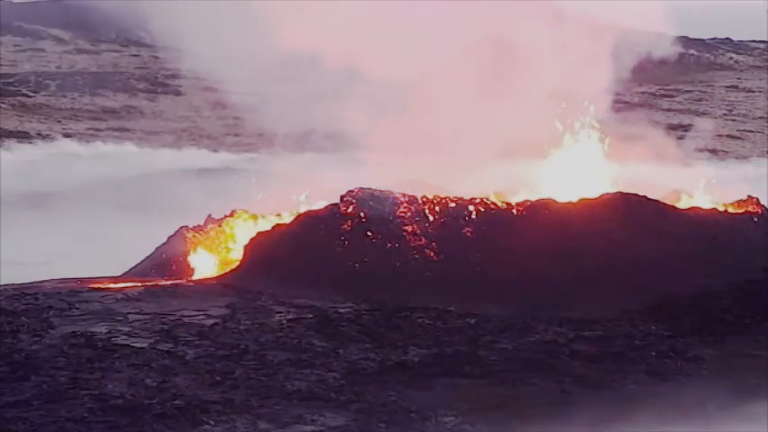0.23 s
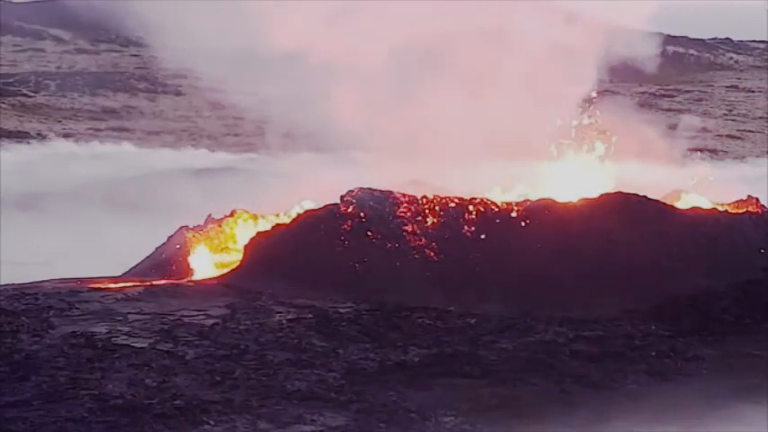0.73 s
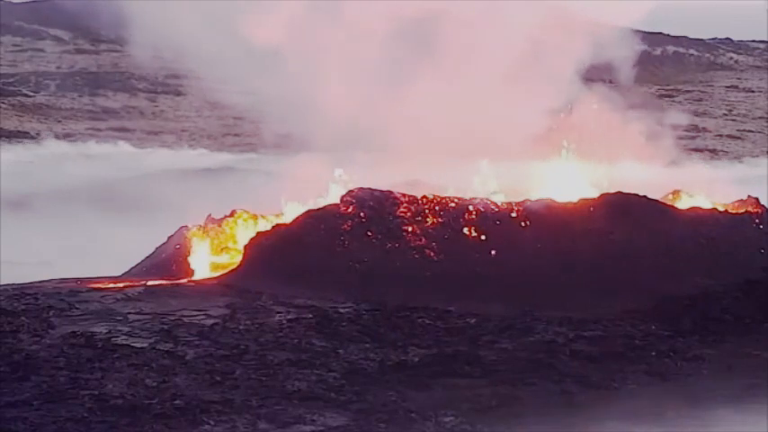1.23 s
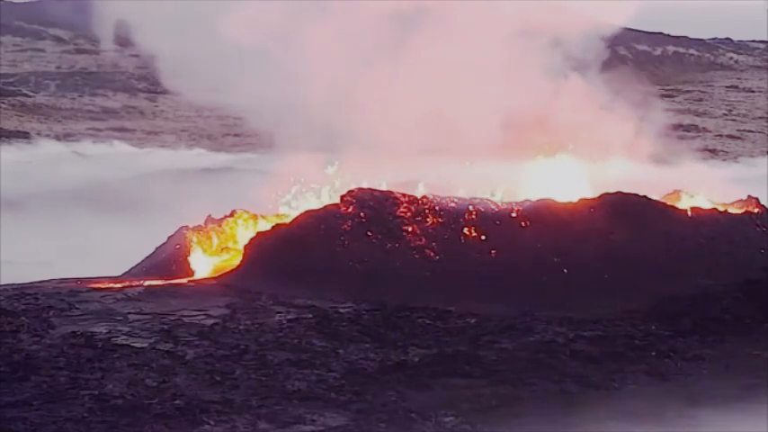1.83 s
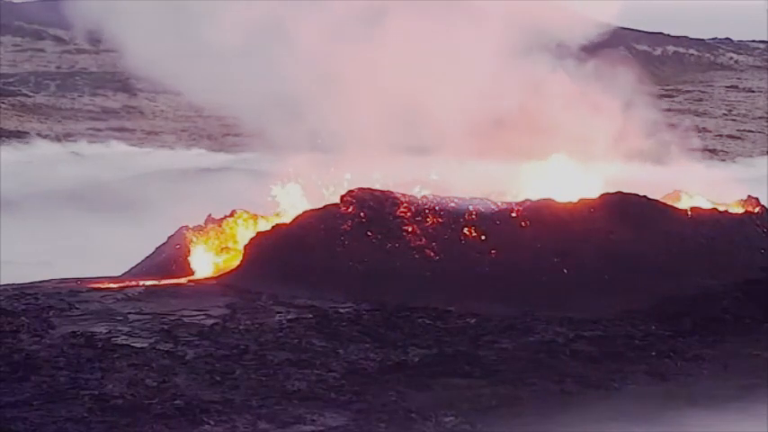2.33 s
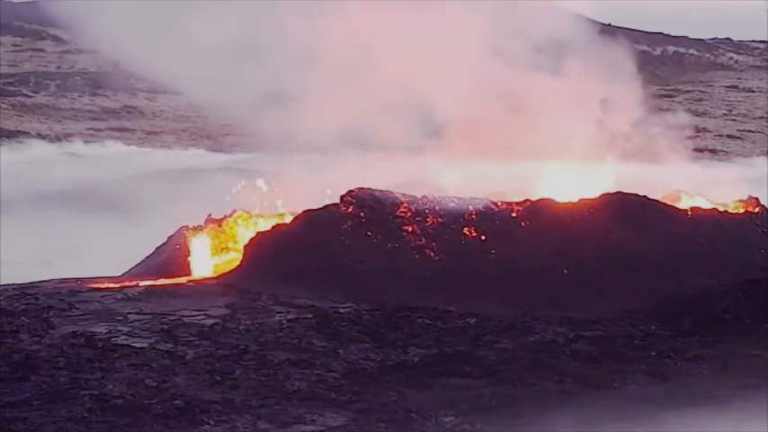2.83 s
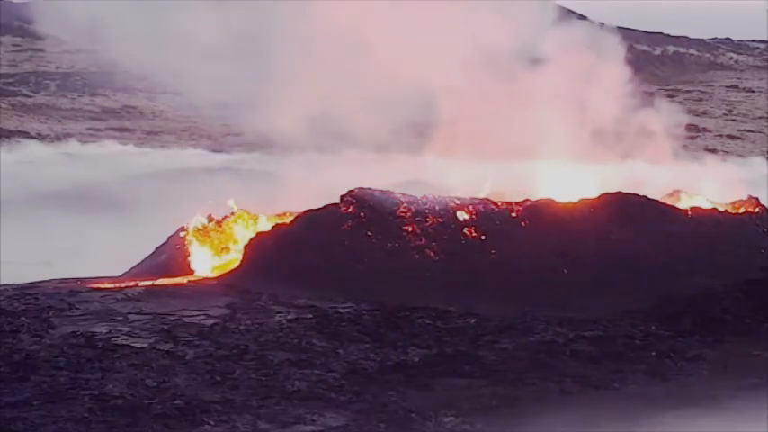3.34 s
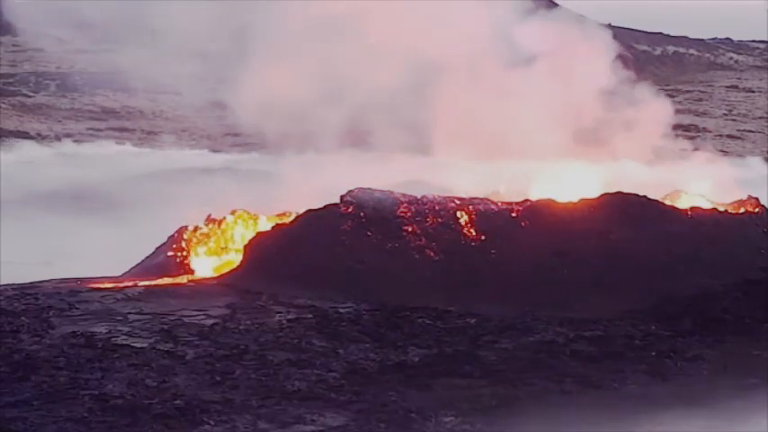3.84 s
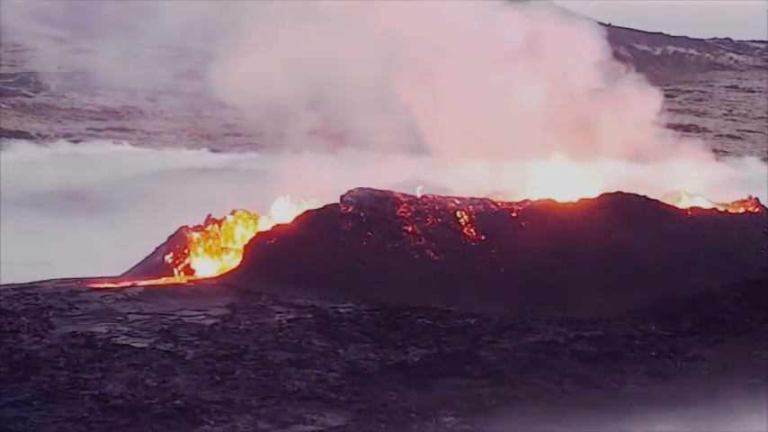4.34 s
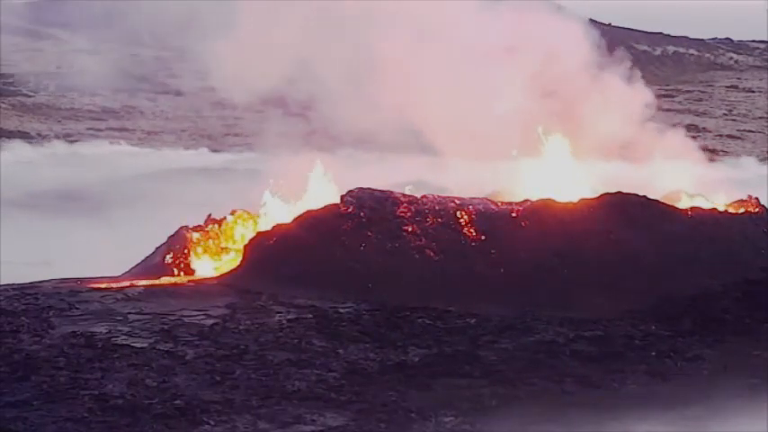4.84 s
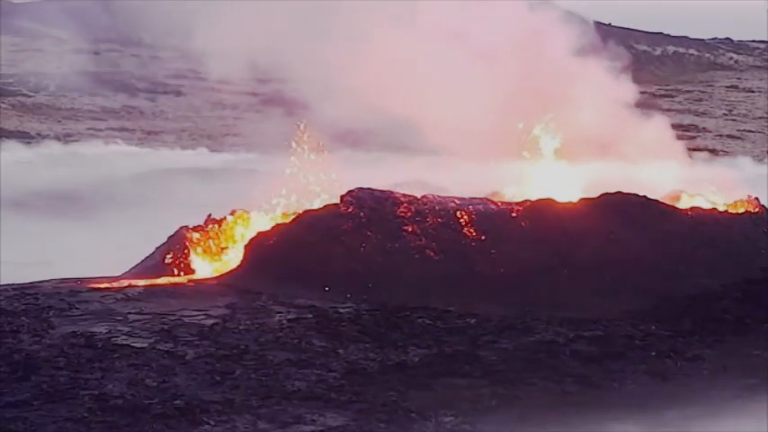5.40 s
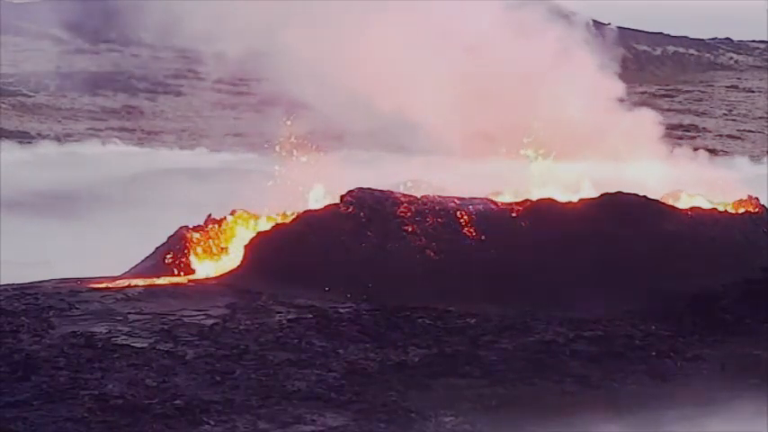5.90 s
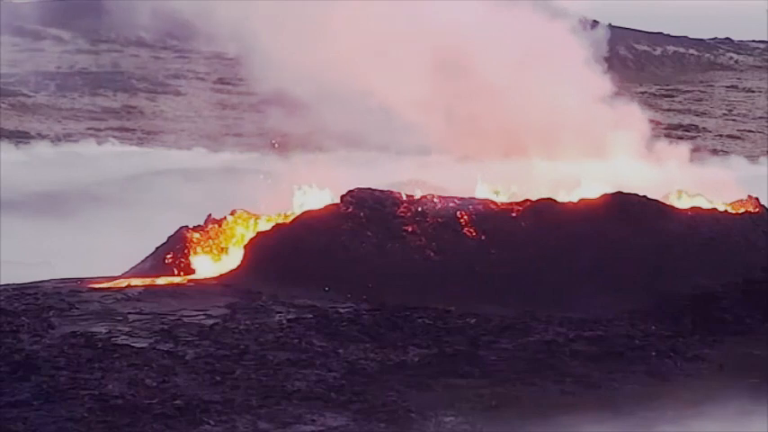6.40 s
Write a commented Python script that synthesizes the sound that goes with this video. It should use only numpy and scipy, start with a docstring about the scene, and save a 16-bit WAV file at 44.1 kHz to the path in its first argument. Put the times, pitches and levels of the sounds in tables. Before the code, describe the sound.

Low, churning rumble of a far-off erupting volcano, dotted with dull thuds and hollow gulps under a surging gas roar.

```python
"""Far from a volcanic vent. Gas bursts thud in the lava pond so densely that they merge into a low
rumble over a deep tremor; the strongest stand out, and smaller pockets gulp hollowly.
Escaping gas roars from one side and swells; the long air path has taken off its treble.
Two spaced microphones, with a faint hiss of their own."""
import sys
import numpy as np
from scipy import signal
from scipy.fft import rfft, irfft, next_fast_len
from scipy.io import wavfile
from scipy.ndimage import uniform_filter1d, map_coordinates

SR = 44100
rng = np.random.default_rng(int(sys.argv[2]) if len(sys.argv) > 2 else 0)


def generate_wav(sig):
    """Save sig (samples, or channels by samples) to the path in sys.argv[1] as 16-bit PCM at SR."""
    pcm = np.round(np.clip(np.atleast_2d(sig).T, -1, 1) * 32767).astype(np.int16)
    wavfile.write(sys.argv[1], SR, pcm)


N = 293706

# strongest gas bursts: (time [s], level [dB], pitch [Hz], left-right [dB])
BURST_EVENTS = [(0.1, -26.5, 118, -2), (0.142, -24.5, 109, 3), (0.178, -22, 166, 6), (0.238, -24, 184, 12),
                (0.252, -22.5, 171, 4), (0.534, -24, 202, 1), (0.603, -29, 150, 1), (0.637, -21.5, 127, 3),
                (0.854, -20, 135, -3.5), (0.885, -20, 170, -4), (0.908, -21.5, 180, 2),
                (0.932, -22, 112, 3), (0.952, -27.5, 110, 1), (0.976, -21, 108, 1.5),
                (1.055, -19.5, 165, -6), (1.435, -21, 137, 0), (1.668, -22, 155, -10),
                (1.851, -20.5, 143, -2), (1.878, -19.5, 163, -3), (1.742, -23.5, 150, -1),
                (1.997, -25, 170, -7), (2.018, -24.5, 171, -1), (2.158, -24, 224, 1), (2.459, -28, 131, 4),
                (2.495, -22.5, 139, -3), (2.571, -25.5, 186, -4), (2.599, -21, 143, 0),
                (2.656, -21.5, 174, 3), (2.69, -19.5, 167, -8), (2.871, -20.5, 166, -3),
                (2.939, -24, 198, -6), (2.974, -27, 130, 4), (3.191, -24, 137, 0), (3.245, -23, 142, 1),
                (3.425, -23.5, 126, 1), (3.895, -21.5, 204, -2), (3.929, -20.5, 174, 0),
                (4.371, -24, 104, 2), (4.425, -25, 121, 4), (4.473, -29, 111, -8), (4.54, -23, 215, 5),
                (4.593, -26, 152, 4), (4.613, -25, 205, -1), (4.736, -20, 180, 1), (4.824, -22, 104, 3.5),
                (4.92, -22, 117, -3), (4.955, -22, 131, -2), (5.09, -22, 165, -2), (5.123, -21, 180, -2),
                (5.166, -20, 120, -2), (5.416, -24, 94, -0.5), (5.565, -24.5, 131, -4),
                (5.761, -24.5, 133, 0), (5.81, -28, 130, 0), (5.851, -24, 109, -1), (5.868, -24, 108, -1),
                (5.887, -21, 151, 0.5), (5.908, -28, 125, 5), (6.155, -22.5, 150, -3), (6.17, -21, 133, -4),
                (6.349, -22.5, 210, 0), (6.395, -30, 149, -1), (6.494, -24, 152, 3), (6.585, -23.5, 132, 1)]


def amp(db):
    return 10 ** (np.asarray(db) / 20)


def unit(x):
    return x / np.sqrt(np.mean(x ** 2) + 1e-20)


def curves(rows):
    """Per-sample curve for each column after the time."""
    times_s, *columns = np.transpose(rows)
    return [np.interp(np.arange(N) / SR, times_s, column) for column in columns]


def wobble(rate_hz):
    """Smooth random curve, rate_hz knots a second."""
    knots = rng.standard_normal(int(N * rate_hz / SR) + 4)
    return map_coordinates(knots, [np.arange(N) * rate_hz / SR])


def filtered(x, response):
    """Apply a complex frequency response."""
    size = next_fast_len(N + SR // 2)
    return irfft(rfft(x, size) * response(np.fft.rfftfreq(size, 1 / SR)), size)[..., :N]


def stereo_noise(spectrum, correlation, patchy_db, lumps=1, left_lag_s=0):
    """Shaped noise pair, rms 1, its level patchy in time and frequency."""
    cells = signal.stft(lumps * rng.standard_normal((2, N)), nperseg=1024)[2]
    patches = uniform_filter1d(rng.standard_normal(cells.shape[1:]), size=4, axis=0)
    patches = uniform_filter1d(patches, size=5, axis=1)
    pair = signal.istft(cells * amp(patchy_db * unit(patches)), nperseg=1024)[1][:, :N]
    knots_hz, knots_db = np.transpose(spectrum)
    mid, side = filtered(pair, lambda hz: amp(np.interp(np.log(hz + 1), np.log(knots_hz + 1), knots_db)))
    width_rad = np.arccos(np.clip(correlation, 0, 1)) / 2
    mid, side = np.cos(width_rad) * mid, np.sin(width_rad) * side
    stereo = np.array([mid + side, mid - side])
    delay_s = np.array([[left_lag_s], [-left_lag_s]]) / 2
    return unit(filtered(stereo, lambda hz: np.exp(-2j * np.pi * hz * delay_s)))


def rumble():
    """Countless overlapping bursts: lumpy low noise over a deep tremor."""
    # pond activity: (time [s], level [dB], upper-band lift [dB])
    activity = [(0, -28, -1), (0.1, -30, -0.5), (0.25, -30.5, 3.5), (0.33, -33, 2), (0.42, -30, 4),
                (0.47, -33, 4.5), (0.62, -28.5, 1.5), (0.74, -31.5, 0.5), (0.82, -29, -0.5),
                (0.92, -27, -2), (1.05, -30.5, 0), (1.2, -31.5, 1), (1.35, -29.5, 0.5), (1.5, -30.5, -1),
                (1.62, -31, 0), (1.8, -31, -1), (1.9, -28.5, -2.5), (2.05, -30.5, -1), (2.2, -30.5, 1),
                (2.34, -35.5, 4.5), (2.45, -29.5, 2.5), (2.55, -33.5, 6), (2.68, -33, 5), (2.78, -31, 3),
                (2.95, -29.5, 2), (3.15, -29, 0), (3.35, -31, 2.5), (3.5, -28, -0.5), (3.62, -30.5, 0),
                (3.9, -30, 1), (4.1, -31, 0.5), (4.28, -33, 4), (4.42, -32.5, 2.5), (4.58, -34, 5),
                (4.7, -30.5, -0.5), (4.87, -33.5, 2), (5.0, -34, 5), (5.22, -28.5, -1.5),
                (5.36, -32.5, -0.5), (5.46, -29.5, 1), (5.6, -32, 0), (5.72, -35, 3), (5.87, -29.5, 0.5),
                (5.97, -35.5, 4), (6.08, -30, -1), (6.17, -28.5, 1.5), (6.27, -30, 0), (6.335, -31.5, 0),
                (6.45, -31.5, 3), (6.55, -33.5, 2), (6.66, -28, -3)]
    # swell of the deep band and tremor: (time [s], deep-band lift [dB])
    deep_swell = [(0, -11), (0.3, 0), (0.8, -5), (1.1, -5), (1.45, -2), (1.8, -0.5), (2.1, -3.5),
                  (2.8, 0.5), (3.1, 2), (3.35, 2.5), (3.6, 1), (3.9, 2.5), (4.2, 6), (4.9, -0.5), (5.1, 0),
                  (5.5, 4), (5.9, 4.5), (6.15, 1), (6.66, -2.5)]
    # merged bursts: (frequency [Hz], relative density [dB])
    body_spectrum = [(30, -47), (50, -19.5), (70, -4.5), (105, -0.5), (170, -2), (230, -6.5), (320, -13),
                     (500, -19.5), (800, -23), (1500, -73.5), (4000, -120)]
    # tremor: (frequency [Hz], relative density [dB])
    tremor_spectrum = [(8, -1.5), (20, 15.5), (30, 15.5), (40, 14.5), (60, -1), (100, -44.5), (400, -120)]
    level_db, upper_db = curves(activity)
    deep_db, = curves(deep_swell)
    lumps = amp(0.3 * wobble(40) + 0.2 * wobble(5))
    body = stereo_noise(body_spectrum, correlation=0.5, patchy_db=0.74, lumps=lumps)
    upper = filtered(body, lambda hz: 1 / (1 + (170 / (hz + 1)) ** 4))
    deep = filtered(body, lambda hz: 1 / (1 + (hz / 82) ** 8))
    churn = body + (amp(upper_db) - 1) * upper + (amp(deep_db) - 1) * deep
    tremor = stereo_noise(tremor_spectrum, correlation=0.96, patchy_db=2.5, lumps=amp(2.3 * wobble(4)))
    # the churn slackens around each strong burst
    dip_db, half_width_s = -2, 0.011
    t = np.arange(N) / SR
    dips = sum(np.exp(-((t - start_s - 1 / hz) / half_width_s) ** 2) for start_s, _, hz, _ in BURST_EVENTS)
    return amp(level_db + dip_db * np.minimum(dips, 1)) * churn + amp(-53.5 + 0.59 * deep_db) * tremor


def gas_roar():
    """Swelling, surging gas jet; it stands to one side, so it reaches the left late."""
    # slow swell: (time [s], level [dB], treble lift [dB], further top lift [dB], left-right [dB])
    swell = [(0, -41.5, 3, 2.5, -1), (0.45, -41.5, 1.5, -1, -0.5), (0.9, -41, 0.5, -0.5, -1),
             (1.3, -42.5, 2, -1, -0.5), (1.7, -38, -2, 3.5, -0.2), (2.0, -39, 0.5, 0, -0.8),
             (2.35, -38.5, 0.5, 1, 0.5), (2.6, -36, 0.5, 0.5, -0.2), (2.9, -36.5, 3, 0.3, 0),
             (3.2, -37, 3.5, .8, -0.5), (3.5, -37, 2, -1.3, .3), (3.7, -38, 0.5, 1.5, .3),
             (4.15, -39.5, 3.5, 0.5, 0.5), (4.6, -39.5, 3, -0.5, .3), (4.95, -41, 4.5, -3, -0.3),
             (5.3, -40.5, 2, -2, 0), (5.65, -39, -1.5, 0.5, 0), (6.0, -42.5, 2.5, -1.5, 0),
             (6.35, -41, 0, 1.5, .3), (6.66, -40.5, -1, 2.5, -1)]
    # weight of the roar's low band: (time [s], lift [dB])
    low_swell = [(0, -1), (.6, -0.2), (1.2, 1), (1.8, -1.5), (2.4, -1.5), (3.0, -2), (3.6, -1.5),
                 (4.2, 1.2), (4.8, 1.3), (5.4, 1.6), (6.0, 1), (6.66, -1)]
    # short surges: (peak time [s], rise [dB], half width [s], treble's share of the rise [ratio])
    surges = [(0.474, 2, 0.093, .3), (1.043, 0, 0.025, 2.5), (1.46, 3, 0.045, .8), (1.67, 5, 0.026, .4),
              (1.823, 2, .03, .3), (2.404, 1.5, 0.028, 1.2), (2.692, 0.5, .07, .9), (3.008, 4, 0.036, .6),
              (3.208, 0.5, .04, 0.37), (3.365, 0, 0.034, 0.35), (4.58, 0, 0.04, .3), (5.136, 3, 0.029, .3),
              (5.293, 1, .035, .3), (5.545, 2.5, 0.056, .3), (5.626, 0.5, 0.02, .3), (5.76, 3.5, 0.043, .3),
              (6.176, 3, 0.04, .3), (6.598, 2.5, 0.06, .3)]
    # distant jet: (frequency [Hz], relative density [dB])
    spectrum = [(100, -17.5), (300, -6.5), (450, -3), (600, 0.5), (750, 1.5), (1000, 2.5), (1200, 0),
                (1400, -3.5), (2000, -10), (2600, -16), (3200, -22.5), (4100, -33.5), (4250, -37.5),
                (5300, -44.5), (5600, -62), (7000, -110)]
    swell_db, treble_db, top_db, pan_db = curves(swell)
    low_db, = curves(low_swell)
    t = np.arange(N) / SR
    for peak_s, rise_db, half_width_s, treble_share in surges:
        surge_db = rise_db * np.exp(-((t - peak_s) / half_width_s) ** 2)
        swell_db += surge_db
        treble_db -= (1 - treble_share) * surge_db
    lumps = amp(0.24 * wobble(25))
    jet = stereo_noise(spectrum, correlation=0.14, patchy_db=1.43, lumps=lumps, left_lag_s=0.000502)
    low = filtered(jet, lambda hz: 1 / (1 + (hz / 850) ** 6))
    treble = filtered(jet, lambda hz: 1 / (1 + (1800 / (hz + 1)) ** 4))
    top = filtered(jet, lambda hz: 1 / (1 + (3400 / (hz + 1)) ** 8))
    roar = jet + (amp(low_db) - 1) * low + (amp(treble_db) - 1) * treble
    roar += amp(treble_db) * (amp(top_db) - 1) * top
    return amp(swell_db + 0.73 * wobble(7.7) + np.array([pan_db, -pan_db]) / 2) * roar


def microphone_hiss():
    """Faint self-noise, slightly stronger on the left."""
    # self-noise: (frequency [Hz], relative density [dB])
    spectrum = [(4000, -14), (5500, -1.5), (8500, -3), (11000, -7), (15000, -12), (16000, -15.5)]
    return amp(-83.5) * stereo_noise(spectrum, correlation=0.66, patchy_db=3.3) * amp([[0.7], [-0.7]])


def pops(events, rise_cycles, glide, rise_exponent=0):
    """Each gas pocket pops as a soft push of a few cycles with gliding pitch."""
    out = np.zeros((2, N + SR))
    t = np.arange(SR // 8) / SR
    for start_s, level_db, pitch_hz, pan_db in events:
        cycles = pitch_hz * t
        peak_cycles = rise_cycles * (pitch_hz / 300) ** rise_exponent
        envelope = cycles / peak_cycles * np.exp(1 - cycles / peak_cycles)
        phase_cycles = cycles * (1 + glide * (cycles - 2 * peak_cycles)) + rng.uniform()
        gains = amp(level_db + np.array([[pan_db], [-pan_db]]) / 2)
        start = round(start_s * SR)
        out[:, start:start + len(t)] += gains * envelope * np.sin(2 * np.pi * phase_cycles)
    return out[:, :N]


def bursts():
    """The strongest bursts thud with falling pitch."""
    return pops(BURST_EVENTS, rise_cycles=0.66, glide=-0.033)


def gulps():
    """Smaller pockets gulp hollowly; higher ones ring for more cycles."""
    # small gas pockets: (time [s], level [dB], pitch [Hz], left-right [dB])
    pockets = [(0.212, -35, 374, 2), (0.391, -27, 810, 5), (0.644, -33.5, 361, 1), (0.86, -29, 520, -3),
               (1.458, -27, 303, -3), (1.492, -27, 420, 0), (1.508, -29, 420, 1), (1.682, -25, 286, -1.5),
               (2.397, -28, 300, -6), (2.467, -32, 302, 3.5), (2.736, -30.5, 350, 8), (3.103, -29, 281, -4),
               (3.502, -35, 316, .5), (3.63, -32.5, 320, 11), (3.692, -26.5, 270, -1),
               (3.929, -35, 357, -1.5), (3.999, -23.5, 422, -1), (4.54, -33.5, 333, 5),
               (4.582, -37, 414, 9), (4.598, -25.5, 410, 6), (4.765, -30.5, 380, -4), (4.92, -31, 344, -4),
               (5.135, -25, 280, 3), (5.278, -41, 307, -1), (5.401, -31, 413, -1), (5.737, -30, 790, -5),
               (6.156, -26, 1020, -3), (6.35, -29, 378, -4), (6.43, -28.5, 293, 1), (6.495, -28, 306, 1),
               (6.569, -29.5, 820, -2)]
    return pops(pockets, rise_cycles=1.05, glide=0.0019, rise_exponent=0.8)


def air_path(x, corner_hz=1200):
    """Distance takes off the treble."""
    return filtered(x, lambda hz: 1 / (1 + 1j * hz / corner_hz) ** 3)


def scene():
    """Rumble, far pops and roar, the left slightly stronger."""
    far_pops = air_path(bursts() + gulps())
    return (rumble() + gas_roar() + far_pops) * amp([[0.4], [-0.4]])


def record(dry):
    """Add hiss, then band-limit."""
    limit_hz = 15720
    return filtered(dry + microphone_hiss(), lambda hz: hz < limit_hz)


dry = scene()
out = record(dry)
generate_wav(out)
```